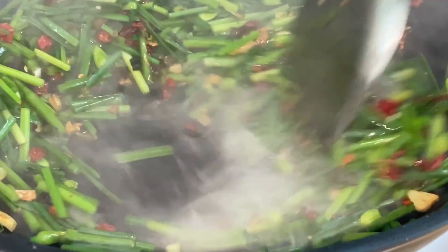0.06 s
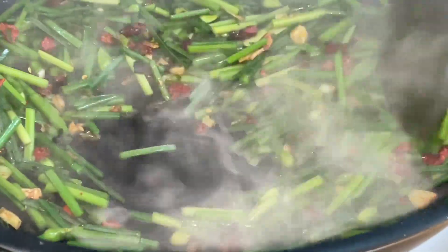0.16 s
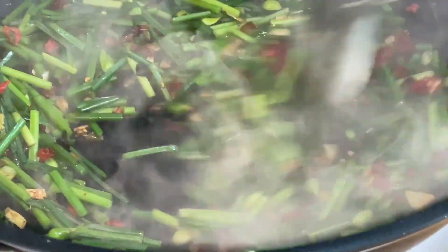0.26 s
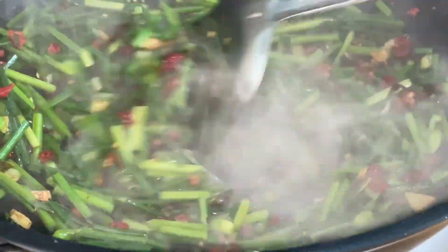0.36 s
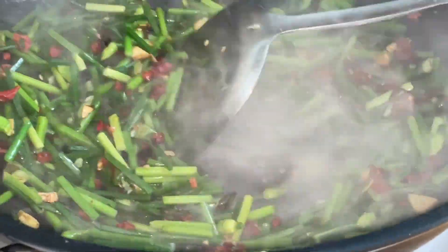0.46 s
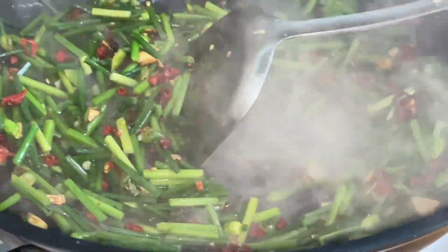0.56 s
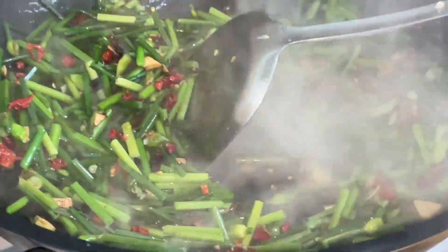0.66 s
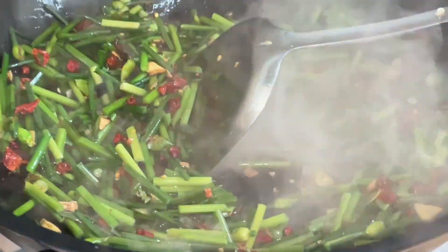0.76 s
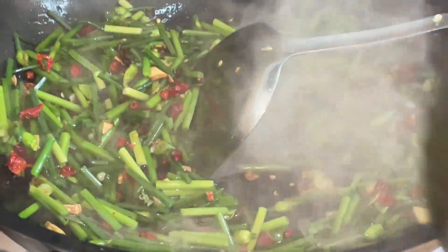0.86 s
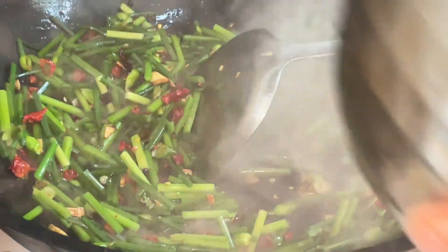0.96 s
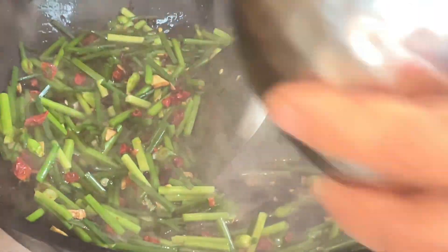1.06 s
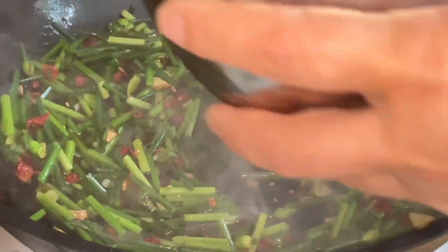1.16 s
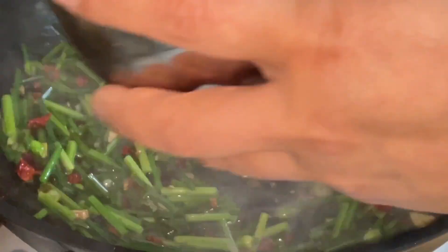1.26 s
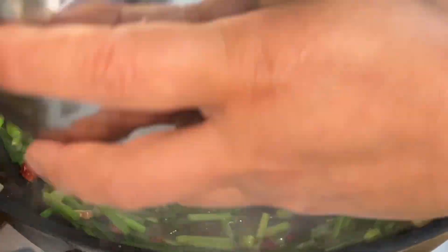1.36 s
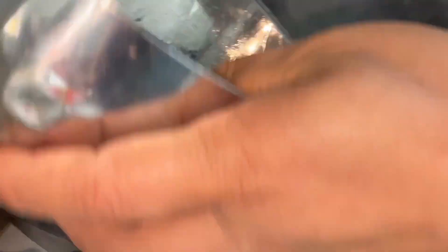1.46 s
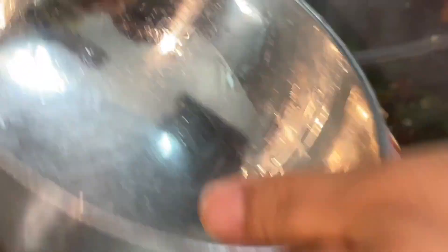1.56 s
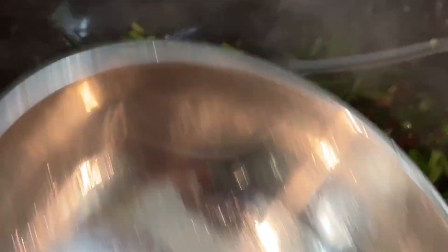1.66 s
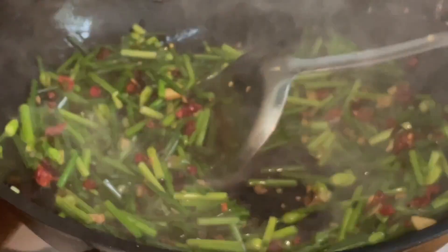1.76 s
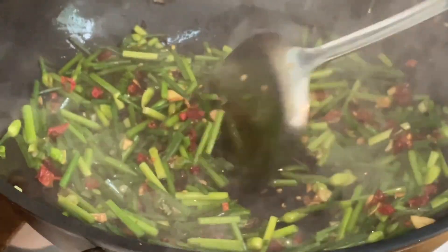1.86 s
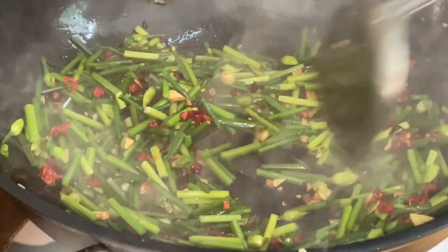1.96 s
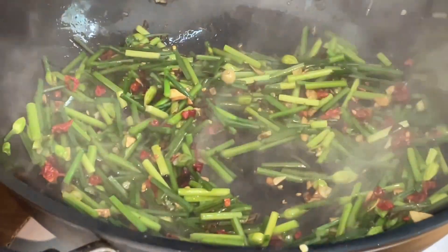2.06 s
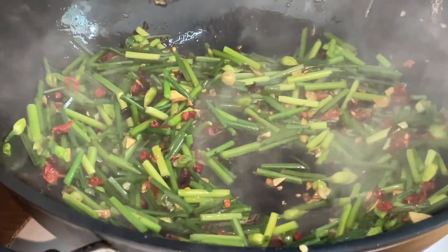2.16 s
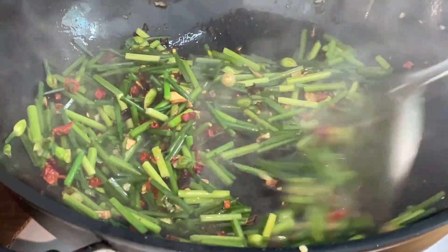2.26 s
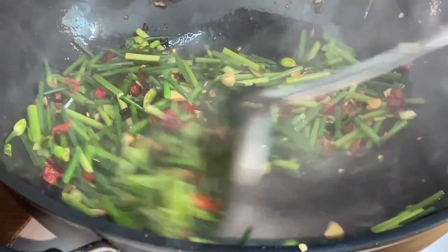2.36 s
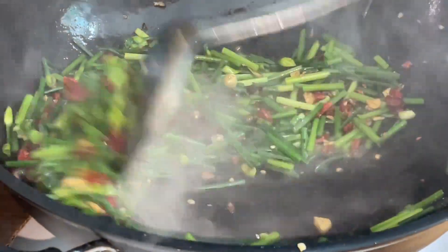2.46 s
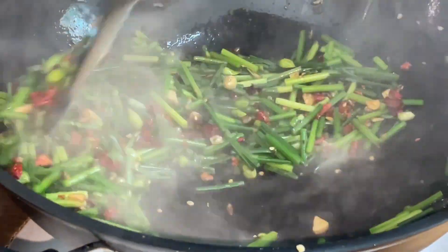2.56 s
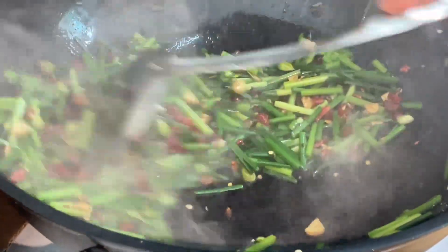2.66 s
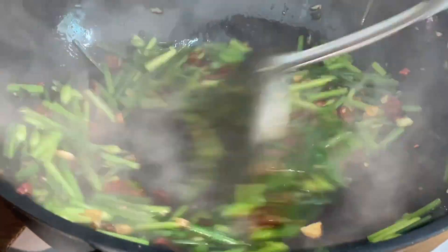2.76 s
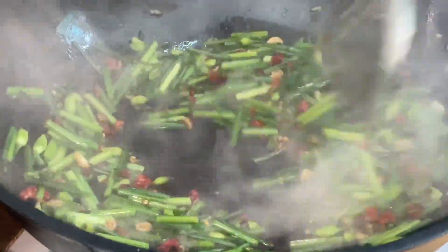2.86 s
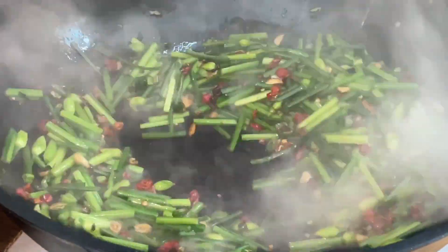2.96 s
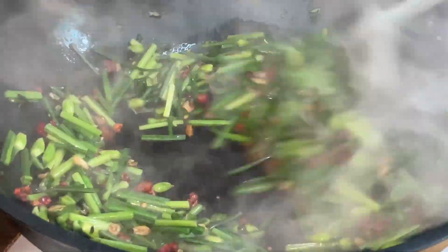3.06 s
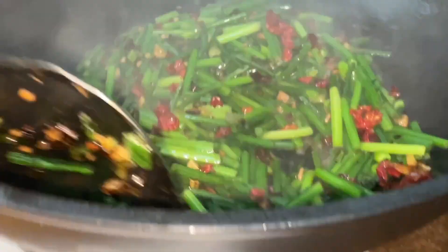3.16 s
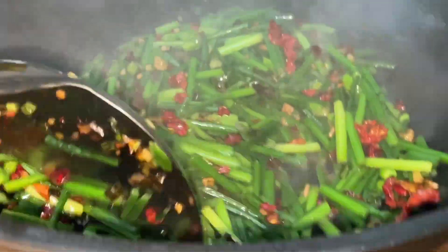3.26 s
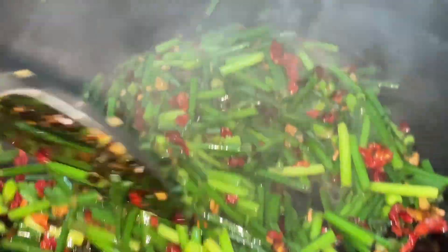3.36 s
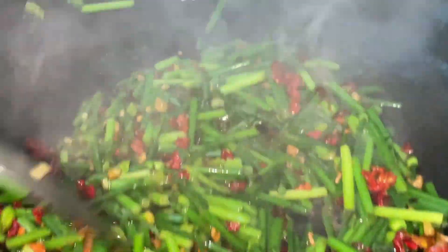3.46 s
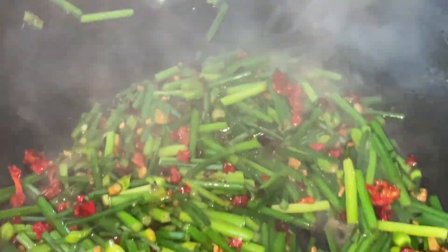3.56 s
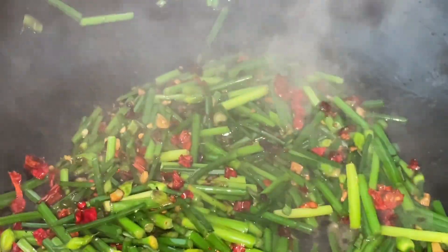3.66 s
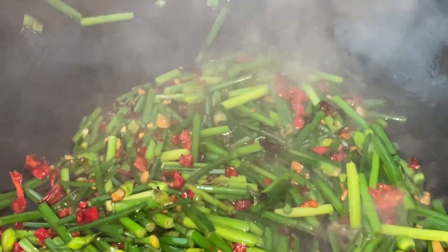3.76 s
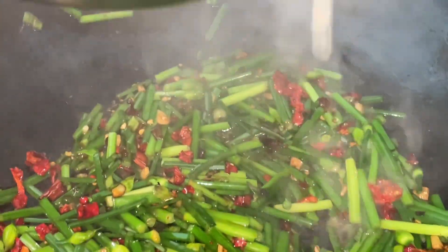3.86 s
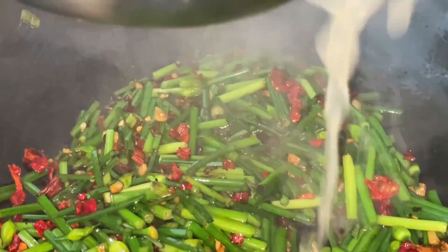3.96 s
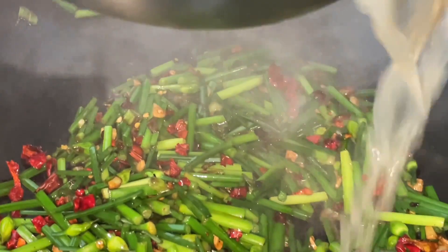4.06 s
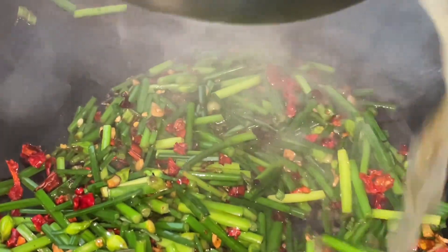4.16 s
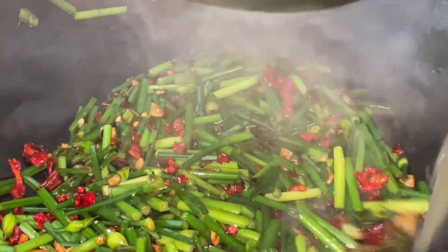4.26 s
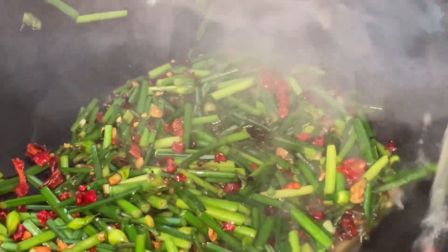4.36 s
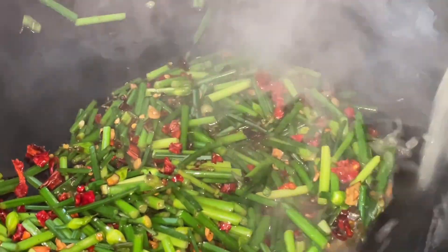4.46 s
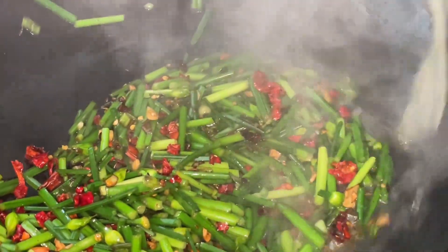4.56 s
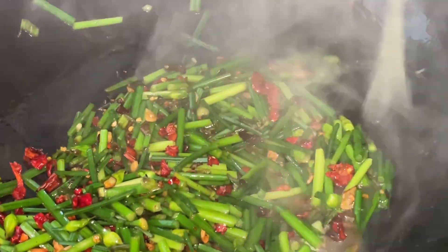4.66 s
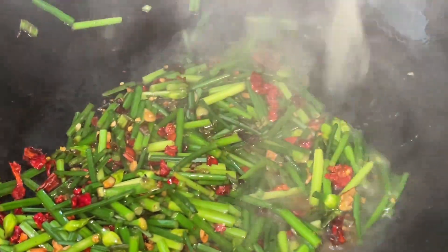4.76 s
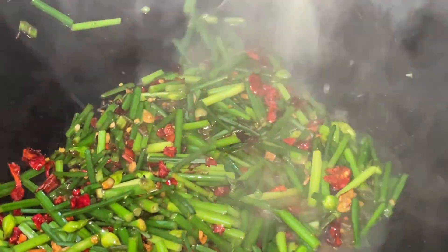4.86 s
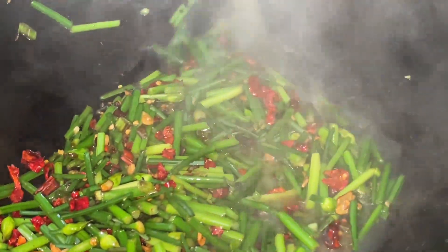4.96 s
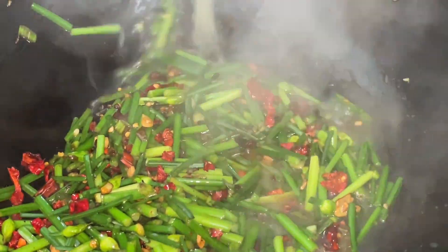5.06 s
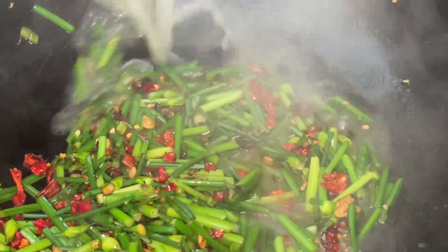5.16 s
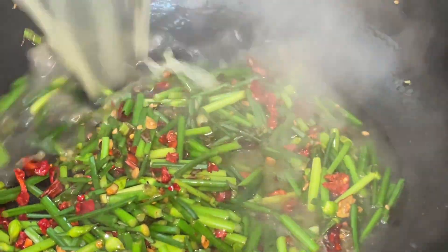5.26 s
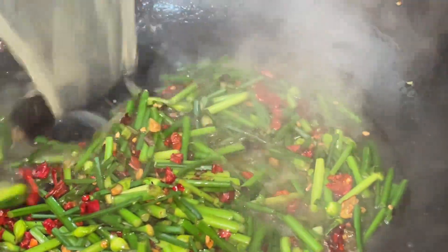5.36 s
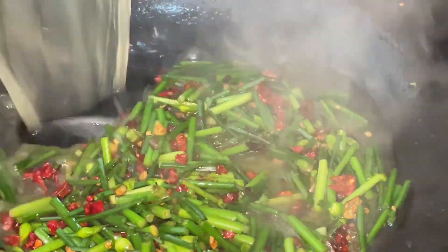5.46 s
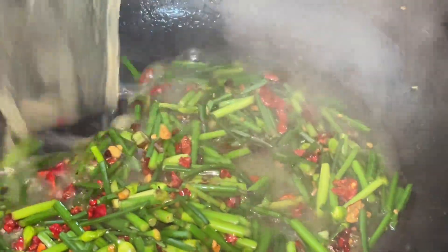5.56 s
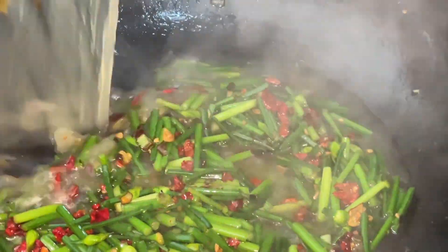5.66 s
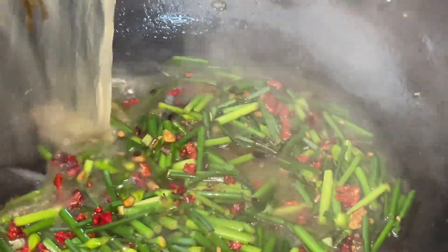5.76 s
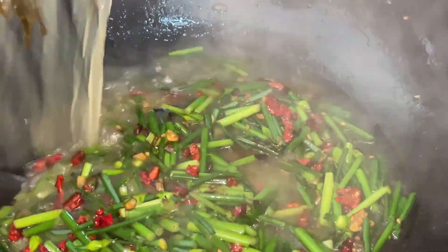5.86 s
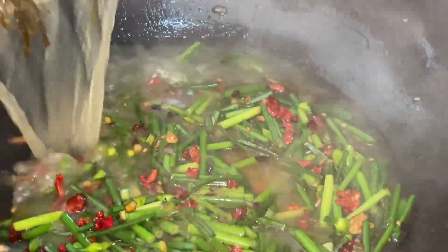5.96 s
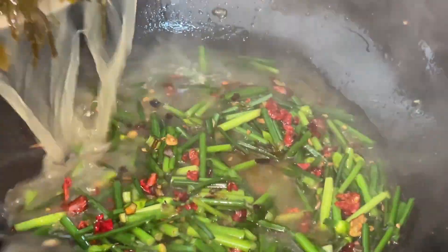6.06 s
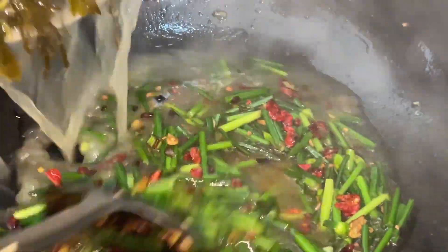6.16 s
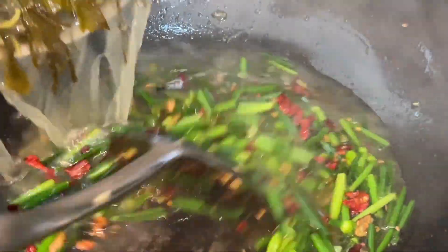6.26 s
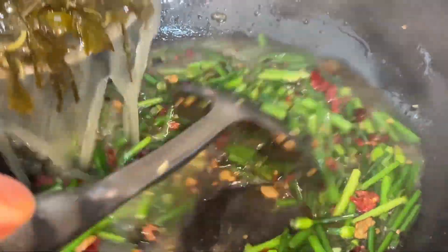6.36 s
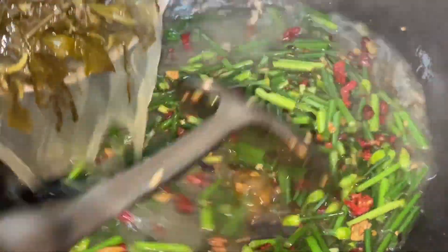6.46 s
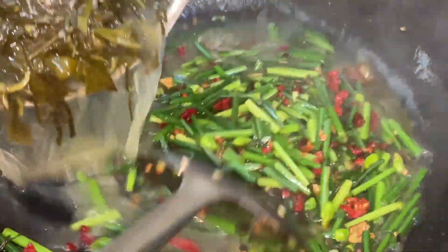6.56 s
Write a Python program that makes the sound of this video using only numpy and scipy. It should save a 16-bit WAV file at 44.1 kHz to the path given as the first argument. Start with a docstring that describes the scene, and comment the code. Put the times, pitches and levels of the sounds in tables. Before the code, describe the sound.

Close to a kitchen stove, a stereo microphone picks up the bright, surging hiss of vegetables frying in a wok, with a flame and fan rumbling underneath. Wet stalks squelch softly while a metal spatula taps and gives four hard, ringing knocks in the first half. After a single sharp spit of oil, liquid splashes and bubbles into the pan, and the frying weakens to a crackle.

```python
"""A kitchen, close to the stove, the stereo microphone facing a wok over a gas burner and under a fan.
Chopped greens and chillies sizzle from the start as their water bursts out of the hot oil. In the first
three seconds a steel spatula pushes them about, ticks on the pan and clashes hard with it four times.
The level dips briefly, the roar swells, and at 4.55 s one drop spits loudly. Last, stock is poured in:
it splashes and bubbles, and the frying thins to a crackle as the pan cools."""
import sys
import numpy as np
from scipy import signal
from scipy.fft import rfft, irfft, next_fast_len
from scipy.io import wavfile

SR = 44100
rng = np.random.default_rng(int(sys.argv[2]) if len(sys.argv) > 2 else 0)


def persist_wave(psi):
    """Save psi, clipped to +-1, as 16-bit WAV."""
    counts = np.round(np.clip(psi, -1, 1) * 32767).astype(np.int16)
    wavfile.write(sys.argv[1], SR, np.atleast_2d(counts).T)


N = 291927
TIME = np.arange(N) / SR
CHANGE_S = 3.119  # the level dips; roar, draught and greens change their sound

# spatula blows that ring the wok: (time [s], spot, level [dB], left minus right [dB])
BLOWS = [(0.3966, "wall", 0.5, -2.5), (1.9485, "rim", 0, -2.5), (2.0668, "bottom", 1.5, -1),
         (2.468, "rim", -17, -4), (2.9186, "slope", -0.5, -0.5), (3.001, "slope", -18, -7),
         (3.518, "slope", -15.5, 2)]
# how the blade bites at the wall, rim, bottom and slope, levels re the blow:
# (spot, grit [dB], centre [Hz], width [Hz], grit of the bounce [dB], thud [dB])
SPOTS = [("wall", -18.5, 3760, 3800, -26.5, -32), ("rim", -26.5, 670, 200, -38, -39),
         ("bottom", -21.5, 6300, 5200, -16.5, -47), ("slope", -16.5, 6500, 4900, -15, -54)]


def frying():
    """Water bursts out of the oil in tiny bubbles; the quieter the pan, the fewer, until they crackle."""
    # spectra of bursting bubbles and of fine spray: (frequency [Hz], level [dB])
    sizzle_spectrum = [(300, -17), (1000, -18.5), (1500, -13.5), (1730, -11.5), (2050, -6), (2500, -4),
                       (3300, -1.5), (4000, -2), (6200, -0.5), (7500, -2.5), (9500, -8), (13000, -15)]
    spray_spectrum = [(3000, -15), (6000, -2), (8500, 2.5), (10000, 2), (11500, -1), (13500, -7.5),
                      (15500, 1)]
    # pan resonances stirred by the frying: (frequency [Hz], width [Hz], level re the sizzle [dB])
    pan_resonances = [(1467, 35, -31.5), (2130, 350, -18), (3320, 190, -27.5)]
    sizzle_db, spray_db = boiling()
    rate = 6000 * undb(sizzle_db + 38) ** 2
    bubbles = clicks(rate, spread_db=1) * undb(.5 * walk(35))
    droplets = clicks(450, spread_db=.5) * undb(2 * walk(13))
    pan = sum(undb(db) * noise_band(hz, width) for hz, width, db in pan_resonances)
    sizzle = colour(bubbles, sizzle_spectrum) + pan
    spray = colour(clicks(rate, spread_db=3) + undb(-22) * droplets, spray_spectrum)
    # larger droplets keep crackling as the pan cools
    crackle = undb(.5 * sizzle_db - 31.5) * colour(droplets, sizzle_spectrum)
    hiss = undb(sizzle_db + 1) * sizzle + undb(spray_db + 3.5) * spray + crackle
    return hiss + undb(-10) * echoes(hiss, t60=.039)  # reflections inside the bowl


def boiling(quench_s=4.75):
    """Relative dB of sizzle and spray: each turn lifts them, the stock quenches them and flares."""
    # the greens are turned and wet sides meet hot steel:
    # (time [s], relative sizzle [dB], relative spray [dB], rise [s], hold [s])
    turns = [(-0.3, -32.5, -34, 0.17, 0.62), (1.55, -36.5, -39, 0.28, 0.11),
             (2.56, -36.5, -35.5, 0.18, .03), (3.05, -30.5, -34, 0.18, 0.76)]
    # stock washes up the hot wall: columns as for the turns
    flares = [(5.05, -40, -44, 0.11, 0.089), (6.05, -37, -41.5, .06, 0.087), (6.42, -47, -47, 0.042, .02)]
    resting_power = undb([[-37.5], [-40.5]]) ** 2
    hot_power = resting_power + surges(turns, fall_db_per_s=8.5)
    quench_db_per_s = [3.3, 19]  # the fine spray dies first
    cooling = undb(-np.outer(quench_db_per_s, np.maximum(TIME - quench_s, 0)))
    return 10 * np.log10(hot_power * cooling ** 2 + surges(flares, fall_db_per_s=51))


def surges(table, fall_db_per_s):
    """Power of sizzle and spray from events that each rise, hold and die away."""
    power = np.zeros((2, N))
    for s, sizzle_db, spray_db, rise_s, hold_s in table:
        age = TIME - s
        fall = undb(-fall_db_per_s * np.maximum(age - rise_s - hold_s, 0))
        envelope = np.clip(age / rise_s, 0, 1) * fall
        power += (undb([[sizzle_db], [spray_db]]) * envelope) ** 2
    return power


def steel(split_hz=6, twin_db=-13, lag_s=.0025):
    """A blow rings the steel, each mode as strongly as the struck spot allows."""
    # wok and spatula ringing together:
    # (frequency [Hz], t60 [s], level struck at the wall [dB], rim [dB], bottom [dB], slope [dB])
    modes = [ (481, .09, -36, -44, -45, -55), (647, 0.045, -35, -29, -32, -60),
             (805, 0.048, -57, -20.5, -31, -60), (1064, .42, -48, -28, -36, -52),
             (1470, .12, -45, -55, -33, -29), (1511, .28, -44, -55, -29, -26.5),
             (1550, .12, -34, -55, -38, -29), (1708, .45, -46, -31, -44, -52),
             (2190, .22, -42, -31, -39, -39), (2330, .17, -26, -46, -46, -39),
             (2363, .35, -35, -32, -55, -57), (2929, .31, -35, -45, -21.5, -48),
             (3335, .18, -40, -36, -45, -37), (3675, .2, -32, -33, -52, -44),
             (3842, .4, -27.5, -48, -48, -48), (4320, .14, -38, -34, -40, -34),
             (4609, .18, -26, -50, -31, -32), (4790, .18, -33, -52, -28, -35),
             (5080, .15, -35, -45, -32, -28), (6344, .22, -30, -55, -26, -33),
             (6475, .1, -26, -52, -23, -34), (6831, 0.12, -36, -44, -39, -23),
             (7330, 0.11, -39, -55, -34, -32), (10300, 0.06, -44, -55, -33, -41)]
    out, age = np.zeros((2, N)), np.arange(SR // 2) / SR
    hz, t60, *spots_db = np.transpose(modes)
    # the pan is not quite round, so every mode beats with a close twin
    twins = undb(twin_db) * np.cos(2 * np.pi * np.outer(hz - split_hz, age))
    decay = np.exp(-np.log(1000) * np.outer(1 / t60, age))
    rings = (np.cos(2 * np.pi * np.outer(hz, age)) + twins) * decay
    spot_db = {row[0]: column for row, column in zip(SPOTS, spots_db)}
    for s, spot, db, balance_db in BLOWS:
        ring = (rng.choice([-1, 1], len(hz)) * undb(db + spot_db[spot])) @ rings
        start = int((s + lag_s) * SR)
        out[:, start:start + len(age)] += undb([[balance_db / 2], [-balance_db / 2]]) * ring
    return out


def blade(bounce_s=.0075, thud_hz=173, thud_width_hz=82, grit_t60=.063, bounce_t60=.062, thud_t60=.16):
    """At each blow the blade bites, bounces once and thuds the wok on its stand; in between it ticks."""
    # ticks on the pan, or a slide where the decay is long: (time [s], level [dB], centre [Hz], t60 [s])
    touches = [(.402, -29.5, 3000, 0.75), (1.0044, -26, 2600, 0.048), (1.206, -24, 4830, 0.068),
               (1.556, -29, 2700, 0.05), (2.4223, -23, 2800, .045), (2.779, -24.5, 2620, 0.049),
               (3.458, -23.5, 1620, 0.033), (3.745, -27.5, 1800, .07), (4.131, -21, 4500, 0.015)]
    bites = {spot: bite for spot, *bite in SPOTS}
    contacts = [(s, db, hz, .98 * hz, t60) for s, db, hz, t60 in touches]
    for s, spot, db, _ in BLOWS:
        grit_db, hz, width, bounce_db, thud_db = bites[spot]
        contacts += [(s, db + grit_db, hz, width, grit_t60),
                     (s + bounce_s, db + bounce_db, hz, width, bounce_t60),
                     (s + bounce_s, db + thud_db, thud_hz, thud_width_hz, thud_t60)]
    return bursts(contacts)


def spit():
    """A drop flashes to steam in the hot oil."""
    # bursts of steam: (time [s], level [dB], centre [Hz], width [Hz], t60 [s])
    steam_bursts = [(4.552, -6, 6000, 7900, 0.011), (4.552, -43, 558, 500, 0.027),
                    (4.5572, -18, 4500, 6000, 0.017)]
    return bursts(steam_bursts)


def pops():
    """A large bubble bursts with one quickly damped note."""
    # single large bubbles: (time [s], level [dB], frequency [Hz], t60 [s])
    large_bubbles = [(4.55, -10.5, 3300, 0.0055), (4.5538, -13, 5660, 0.0041), (5.985, -36, 5400, 0.082),
                     (6.056, -32, 1160, .05)]
    return sum(undb(db) * fade(s, t60) * np.sin(2 * np.pi * hz * (TIME - s))
               for s, db, hz, t60 in large_bubbles)


def splashes():
    """Gulps of stock slap into the pan, each in a band as wide as its centre frequency."""
    # gulps landing: (time [s], level [dB], centre [Hz], t60 [s])
    gulps = [(5.537, -33, 3500, 0.14), (5.66, -35.5, 1700, 0.17), (5.885, -31, 3600, 0.13),
             (6.039, -34.5, 1160, 0.38)]
    return bursts([(s, db, hz, hz, t60) for s, db, hz, t60 in gulps])


def stock(start_s=5.2, end_s=6.6, low_hz=1300, high_hz=6500, cycles=22, rise=.15, count=170):
    """Poured stock traps air; each bubble rings briefly, rising in pitch."""
    out, age = np.zeros(N), np.arange(SR // 20) / SR
    for when, pitch, faintness in rng.random((count, 3)):
        hz = low_hz * (high_hz / low_hz) ** pitch
        life = age * hz / cycles
        glide = 1 + rise * np.minimum(life, 2) / 2
        ring = np.sin(2 * np.pi * hz * age * glide) * np.exp(-np.e * life)
        db = -45 - 3 * np.log(faintness + .0066)  # most are faint, a few stand out
        start = int((start_s + when * (end_s - start_s)) * SR)
        out[start:start + len(age)] += undb(db) * ring[:N - start]
    return out


def stirring(before_db=-48, after_db=-43.5, shove_db=-42.5):
    """Wet stalks squelch and patter, louder after the brief dip and after each shove."""
    # spectrum of wet greens: (frequency [Hz], level [dB])
    wet_spectrum = [(150, -19), (450, -0.5), (750, -7), (1000, 0), (1450, -1.5), (1720, -5), (2100, 0.5),
                    (4000, -8.5), (9000, -15)]
    steady = undb(np.where(TIME < CHANGE_S, before_db, after_db))
    shoved = sum(undb(shove_db + db) * fade(s, t60=1) for s, _, db, _ in BLOWS)
    patter = colour(clicks(2500, spread_db=.4), wet_spectrum)
    return np.hypot(steady, shoved) * patter * undb(1.2 * walk(22))


def burner_and_fan(low_db=-46, drop_db=-54.5, full_db=-40, swell_s=.43):
    """The flame's roar is low, drops, then swells; the fan hums unsteadily and draws air up its duct."""
    # spectrum of the flame: (frequency [Hz], level [dB])
    roar_spectrum = [(20, -52), (32, 6.5), (45, -7.5), (65, -1.5), (105, 0), (145, -7), (210, -7.5),
                     (300, -16), (380, -22.5), (520, -22), (900, -20), (3000, -50)]
    # tones of the fan: (frequency [Hz], level re the roar [dB])
    fan_tones = [(111, -10), (184, -14.5)]
    # airy duct resonances: (frequency [Hz], width [Hz], level before CHANGE_S [dB], level after [dB])
    duct_resonances = [(419, 26, -61, -57), (495.5, 38, -57, -72), (585.5, 34, -60, -51.5),
                       (714, 65, -89, -51)]
    swell_db = np.interp(TIME, [CHANGE_S, CHANGE_S + swell_s], [drop_db, full_db])
    roar_db = np.where(TIME < CHANGE_S, low_db, swell_db)
    roar = colour(rng.standard_normal(N), roar_spectrum)
    hum = sum(undb(db + 1.2 * walk(6)) * np.sqrt(2) * np.sin(2 * np.pi * hz * TIME + walk(22))
              for hz, db in fan_tones)
    draught = sum(undb(np.where(TIME < CHANGE_S, before_db, after_db)) * noise_band(hz, width)
                  for hz, width, before_db, after_db in duct_resonances)
    return undb(roar_db) * (roar + hum) + draught


def widen(x, tail_t60=.16, scatter_rate=1200, split_hz=3500):
    """The sound is wide in the lower middle and in two treble bands."""
    # stereo width by frequency: (frequency [Hz], side minus mid [dB])
    stereo_width = [(50, -23), (250, -11.5), (600, -11.5), (1100, -5), (1500, -10.5), (1750, 3.5),
                    (2300, -48), (5900, -76), (7400, -1.5), (8200, 35), (9300, -2), (11600, -14),
                    (13500, -22), (14800, 55)]
    mono = x.mean(axis=0)
    side_gain = lambda hz: 1 / np.hypot(1, 1 / spectrum(stereo_width, hz))
    low_side = shape(echoes(mono, tail_t60), lambda hz: side_gain(hz) * (hz < split_hz))
    analytic = signal.hilbert(mono, next_fast_len(N))[:N]
    scattered = np.real(analytic * np.exp(1j * np.pi * walk(scatter_rate)))
    high_side = shape(scattered, lambda hz: side_gain(hz) * (hz >= split_hz))
    mid = shape(x, lambda hz: 1 / np.hypot(1, spectrum(stereo_width, hz)))
    return mid + (low_side + high_side) * np.array([[1], [-1]])


def echoes(x, t60):
    """A short dense tail of reflections, as loud as the sound itself."""
    tail = (rng.standard_normal(N) * fade(.0023, t60))[:SR // 4]
    return signal.fftconvolve(x, tail / np.linalg.norm(tail))[:N]


def bursts(table):
    """Short dying bursts of gritty chatter, each in its own band."""
    # spectrum of the chatter: (frequency [Hz], level [dB])
    chatter_spectrum = [(100, 21), (700, -3), (1200, -12), (1700, -2.5), (2300, -2.5), (3700, -1.5),
                        (4600, -1.5), (5900, -1.5), (6600, -4.5), (8000, 0.5), (11000, -2), (15500, -8)]
    out, age = np.zeros(N), np.arange(SR // 2) / SR
    chatter = colour(clicks(24000, spread_db=1), chatter_spectrum)
    for s, db, hz, width, t60 in table:
        start = int(s * SR)
        grit = unit(resonate(chatter[start:start + len(age)], hz, width))
        out[start:start + len(grit)] += undb(db) * grit * np.exp(-np.log(1000) * age[:len(grit)] / t60)
    return out


def clicks(rate, spread_db):
    """Clicks at random moments, rate a second, a few larger than the rest."""
    happens = rng.random(N) < rate / SR
    sizes = rng.uniform(-.86, 1, N) * undb(spread_db * np.minimum(rng.exponential(size=N), np.pi))
    return unit(happens * sizes / np.sqrt(np.minimum(rate, SR)))


def walk(rate):
    """Smooth random wandering, spread near 1."""
    knots = rng.standard_normal(N // 10)
    return np.interp(TIME * rate, np.arange(len(knots)), knots)


def fade(start, t60):
    """A sudden start and an exponential decay."""
    age = TIME - start
    return (age >= 0) * np.exp(-np.log(1000) * np.clip(age / t60, 0, 10))


def noise_band(hz, width_hz):
    """Noise through one resonance; rms 1."""
    return unit(resonate(rng.standard_normal(N), hz, width_hz))


def resonate(x, hz, width_hz):
    """Two-pole band-pass, gain 1 at the centre."""
    g, k = np.tan(np.pi * hz / SR), width_hz / hz
    return signal.lfilter([g * k, 0, -g * k], [1 + g * k + g * g, 2 * g * g - 2, 1 - g * k + g * g], x)


def colour(x, table):
    """Give a sound a spectrum; rms 1."""
    return unit(shape(x, lambda hz: spectrum(table, hz)))


def shape(x, gain):
    """Filter a sound by a gain that is a function of frequency."""
    size = next_fast_len(N)
    hz = np.maximum(np.arange(size // 2 + 1) * SR / size, 1)
    return irfft(rfft(x, size) * gain(hz), size)[..., :N]


def spectrum(table, hz):
    """Gain at hz from points of (frequency [Hz], level [dB])."""
    points_hz, db = np.transpose(table)
    return undb(np.interp(np.log(hz), np.log(points_hz), db))


def undb(db):
    """Decibels to gain."""
    return 10 ** (np.asarray(db) / 20)


def unit(x):
    """Scale to rms 1."""
    return x / np.sqrt(np.mean(x ** 2) + 1e-18)


def scene():
    """Everything comes from the stove, straight ahead of the microphone."""
    food = frying() + stirring() + stock() + splashes() + spit() + pops()
    spatula = blade() + steel()
    return widen(food + spatula + burner_and_fan())


def record(dry, onset_s=.001, recovery_s=.0051, bottom_hz=38, top_hz=15650):
    """The level dips briefly once; the deepest bass and the top are cut."""
    age = TIME - CHANGE_S
    dip_db = -34 * np.clip(age / onset_s, 0, 1) * np.exp(-np.abs(age) / recovery_s)
    out = np.clip(dry * undb(dip_db), -1, 1)
    out = signal.sosfilt(signal.butter(10, bottom_hz, "high", fs=SR, output="sos"), out)
    return signal.sosfilt(signal.ellip(14, .1, 80, top_hz, fs=SR, output="sos"), out)


dry = scene()
out = record(dry)
persist_wave(out)
```